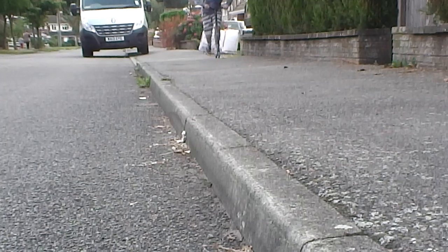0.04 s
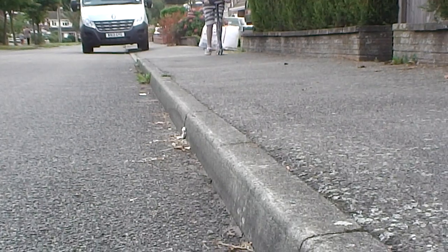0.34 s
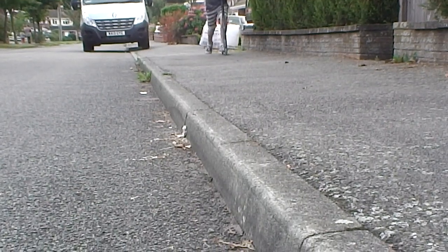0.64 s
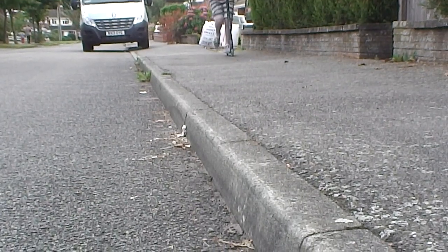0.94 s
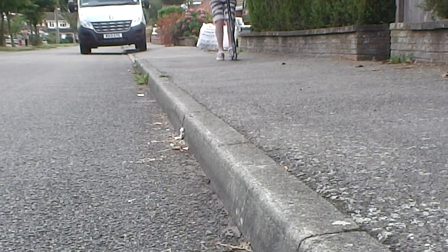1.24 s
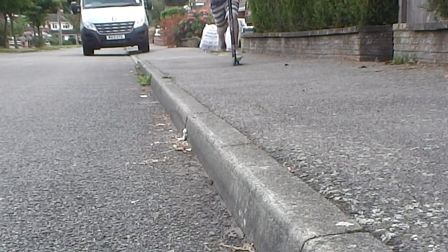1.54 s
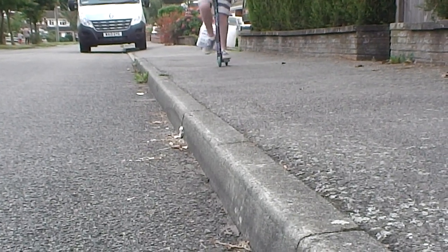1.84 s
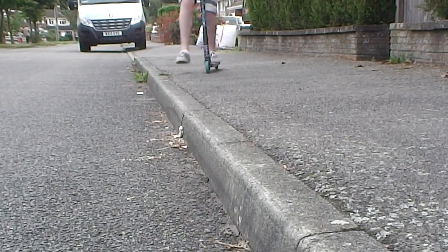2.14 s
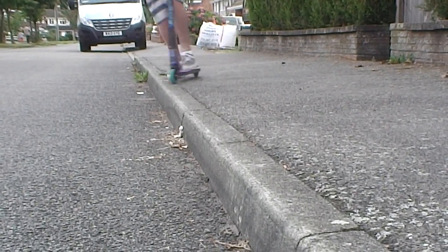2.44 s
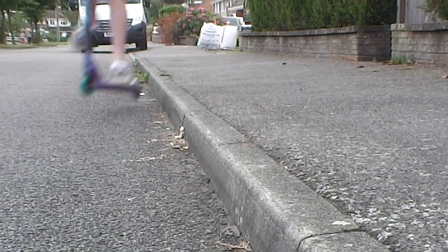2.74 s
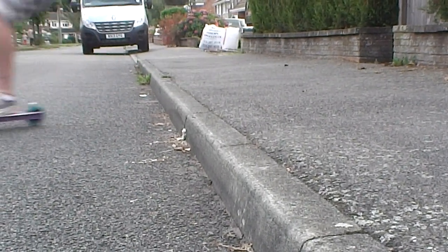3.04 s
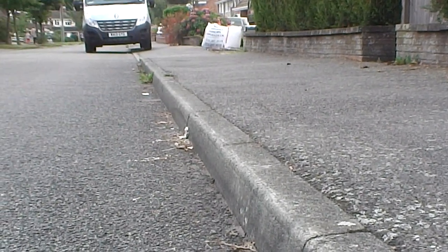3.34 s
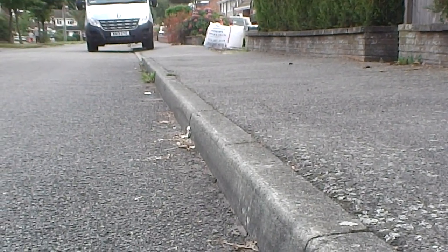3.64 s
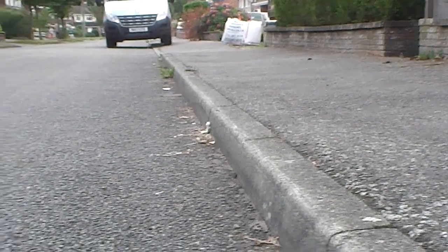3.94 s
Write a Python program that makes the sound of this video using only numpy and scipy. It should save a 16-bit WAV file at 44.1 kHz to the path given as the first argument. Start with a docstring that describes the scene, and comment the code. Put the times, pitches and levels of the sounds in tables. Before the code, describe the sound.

On a suburban street with faint steady traffic, a kick scooter approaches with bursts of metallic rattle. It briefly quietens in a jump, clacks down close to the microphone, then rolls off to the left with a gritty hum.

```python
"""Kick scooter off the kerb

A kick scooter comes along a rough pavement, hops off the kerb, lands hard beside the microphone and
rolls away to the left. The tarmac shakes the deck, which hums in its resonances, and loose metal parts
rattle in short bursts; both fall back during the hop. Behind it is the rush of a suburban street."""
import sys
import numpy as np
from scipy import signal
from scipy.fft import rfft, irfft, next_fast_len
from scipy.io import wavfile
from scipy.ndimage import map_coordinates

SR = 44100
rng = np.random.default_rng(int(sys.argv[2]) if len(sys.argv) > 2 else 0)


def put_to_file(sound):
    """Save the sound as 16-bit audio at rate SR, in the file named by the first command-line argument."""
    columns = np.atleast_2d(sound).T  # one column per channel
    safe = np.clip(columns, -1, 1)
    whole_steps = np.round(safe * 32767)
    wavfile.write(sys.argv[1], SR, whole_steps.astype(np.int16))


N = 176400
T = np.arange(N) / SR
TOP_HZ = 16200


def amp(db):
    """Decibels to gain."""
    return 10 ** (np.asarray(db) / 20)


def unit(x):
    """Scale to rms 1."""
    return x / np.sqrt(np.mean(x ** 2) + 1e-20)


def along(points, hz):
    """Read (Hz, value) points on a log frequency axis."""
    freqs, values = np.transpose(points)
    return np.interp(np.log(hz + 1), np.log(freqs + 1), values)


def curve(rows):
    """Automation: (seconds, value) points joined by straight lines."""
    return np.interp(T, *np.transpose(rows))


def wobble(rate):
    """A smooth random curve with rate knots a second."""
    return map_coordinates(rng.standard_normal(2048), [T * rate], mode="wrap")


def filtered(x, response):
    """Shape x with a response given as a function of frequency."""
    size = next_fast_len(N + SR // 2)
    return irfft(rfft(x, size) * response(np.fft.rfftfreq(size, 1 / SR)), size)[..., :N]


def coloured(x, points):
    """Minimum-phase EQ of unit energy through (Hz, dB) points."""
    size = 4096
    cepstrum = irfft(np.log(amp(along(points, np.fft.rfftfreq(size, 1 / SR)))))
    cepstrum[1:size // 2] *= 2
    cepstrum[size // 2 + 1:] = 0
    impulse = irfft(np.exp(rfft(cepstrum)))
    return signal.fftconvolve(x, impulse / np.linalg.norm(impulse))[:N]


def tail(t60):
    """Dying noise of unit energy."""
    t = T[:SR // 4]
    noise = rng.standard_normal(len(t)) * 1000. ** (-t / t60)
    return noise / np.linalg.norm(noise)


def clicks(rate, spread_db):
    """Random impulses of random size, about rate a second, at rms 1."""
    impulses = (rng.random(N) < rate / SR) * np.sign(rng.standard_normal(N))
    return unit(impulses * amp(spread_db * np.clip(rng.standard_normal(N), -2, 2)))


def add(track, s, x):
    """Mix x into the track at s seconds."""
    part = track[round(s * SR):][:len(x)]
    part += x[:len(part)]


def pan(db):
    """Stereo gains that put left above right by db."""
    return np.array([amp(db / 2), amp(-db / 2)]).reshape(2, -1)


def street(level_db=-32.5, pan_db=-1.54, waver_db=0.47):
    """Far traffic: a steady dull rush, narrow in the bass and wide in the treble."""
    # Tone of the traffic. Each row: frequency in Hz, relative level in dB.
    colour = [(25, -12), (60, -12), (130, -4), (220, -5.5), (340, -9), (600, -3), (950, 0), (1300, -4.5),
              (1800, -14.5), (2200, -23), (2800, -37), (5000, -37.5), (6000, -45.5), (12000, -47.5),
              (16000, -54)]
    # Stereo image. Each row: frequency in Hz, left-right likeness from 0 to 1.
    likeness = [(100, .99), (300, 0.96), (600, 0.94), (1100, 0.76), (2000, 0.66), (5000, 0.28), (12000, .3)]

    def mid_and_side(hz):
        width = np.arccos(np.clip(along(likeness, hz), -1, 1)) / 2
        return amp(along(colour, hz)) * [np.cos(width), np.sin(width)]

    mid, side = filtered(rng.standard_normal((2, N)), mid_and_side)
    rush = unit(np.array([mid + side, mid - side])) * pan(pan_db)
    return rush * amp(level_db + waver_db * wobble(6.91))


def rolling(hum_hz=238, hum_width_hz=13.4):
    """Stones of the tarmac jolt the wheels and set the deck humming."""
    # Resonances of the rolling scooter. Each row: centre in Hz, width in Hz, relative level in dB.
    resonances = [(149, 101, -3.5), (247, 48, 1), (317, 75, -0.5), (468, 50, -3), (564, 88, -2),
                  (687, 114, -2.5), (930, 206, -5.5), (1226, 130, -3), (1480, 340, -7), (1863, 140, -7.5)]
    # Softness of the wheels. Each row: frequency in Hz, relative gain in dB.
    tyre = [(25, -11.5), (100, -2), (1500, -1), (2100, -7.5), (2800, -7.5), (5000, -48), (9000, -70)]
    # How hard the tarmac shakes the deck. Each row: time in seconds, level in dB.
    shake = [(.1, -41), (.6, -40), (.75, -39), (1.1, -47), (1.6, -38.5), (2.25, -36.5), (2.37, -30.5),
             (2.58, -32), (2.68, -41), (2.86, -30.5), (2.89, -27.5), (3.04, -33), (3.3, -32.5),
             (3.7, -36.5), (4, -37)]
    # The deck's main bending mode within the roll. Each row: time in seconds, relative level in dB.
    hum_level = [(.8, -7), (1.35, 1.5), (1.8, -9), (2.5, -6), (3, -5.5), (3.3, -1.5), (4, 0)]

    def mode(hz, centre, width):
        return 1j * hz * width / (centre ** 2 - hz ** 2 + 1j * hz * width)

    def all_modes(hz):
        return sum((-1) ** k * amp(db) * mode(hz, centre, width)
                   for k, (centre, width, db) in enumerate(resonances))

    jolts = clicks(rate=1500, spread_db=4.5) * amp(2.32 * wobble(35))
    body = coloured(filtered(jolts, all_modes), tyre)
    hum = filtered(clicks(rate=1500, spread_db=2.5), lambda hz: mode(hz, hum_hz, hum_width_hz))
    return (amp(-2) * unit(body) + amp(curve(hum_level)) * unit(hum)) * amp(curve(shake))


def wheel_drone():
    """Rough ground drives a low rumble, a faint whine and a mid drone that peaks on landing."""
    # Tone of each layer. Each row: frequency in Hz, relative level in dB.
    drone_colour = [(250, -36), (450, -12), (570, 2), (680, -1), (820, -5), (1500, -25.5), (1900, -14),
                    (2500, -34), (4000, -53)]
    rumble_colour = [(25, -1), (70, -2), (150, 2.5), (220, -21), (500, -60)]
    whine_colour = [(1000, -48), (1650, -13), (1780, 4.5), (1950, -7), (2150, -20), (3000, -57)]
    # Fader moves of each layer. Each row: time in seconds, level in dB.
    drone_level = [(2.2, -61), (2.37, -31.5), (2.45, -45), (2.58, -38), (2.7, -47), (2.87, -53),
                   (2.93, -32.5), (2.98, -23), (3.04, -33), (3.25, -35.5), (3.5, -53), (4, -54)]
    rumble_level = [(.1, -67), (1.3, -86), (1.55, -42), (2.3, -45), (2.7, -49), (3.2, -49), (4, -47)]
    whine_level = [(.3, -75), (.6, -47), (.85, -49), (1.05, -74), (2.9, -72), (3.1, -48), (3.6, -47.5),
                   (4, -49)]
    layers = [(drone_colour, drone_level), (rumble_colour, rumble_level), (whine_colour, whine_level)]
    return sum(unit(coloured(clicks(rate=1000, spread_db=2.5), colour)) * amp(curve(level))
               for colour, level in layers)


def grit(patchy_db=3.3, stones_db=-3):
    """Fine crunch of the wheels on the road, with ticks of single stones."""
    # Tone of the gritty hiss. Each row: frequency in Hz, relative level in dB.
    colour = [(500, -30), (1400, 4), (1950, 7.5), (2400, -6), (2800, -10), (3500, 5.5), (4200, -4),
              (5100, 4), (5900, -5), (9000, -14.5), (16000, -16)]
    # Its fader moves. Each row: time in seconds, relative level in dB.
    level = [(.1, -77), (2.25, -81), (2.36, -72), (2.56, -48.5), (2.63, -58), (2.83, -55), (2.88, -58),
             (3.2, -45), (3.6, -46.5), (4, -49.5)]
    crunch = clicks(rate=5000, spread_db=7) * amp(patchy_db * wobble(90))
    stones = amp(stones_db) * clicks(rate=90, spread_db=3.5)
    return unit(coloured(crunch + stones, colour)) * amp(curve(level))


def pings(hits, hz, spread, t60, count):
    """Each metal contact rings at count random pitches around hz, keeping its energy."""
    onsets, t = np.flatnonzero(hits), T[:440].astype(np.float32)
    pitch = np.minimum(hz * np.exp(spread * rng.standard_normal((N, count, 1))[onsets]), TOP_HZ)
    rings = np.sin(np.float32(2 * np.pi * pitch) * t).sum(1) * np.float32(amp(-60 * t / t60))
    rings = rings * (hits[onsets] / np.linalg.norm(rings, axis=1))[:, None]
    positions = onsets[:, None] + np.arange(len(t))
    return np.bincount(positions.ravel(), rings.ravel(), N)[:N]


def rattle(clump_db=6, clump_rate=80, burst_trim_db=-2):
    """Loose metal parts chatter in swelling clumps of tiny clicks, each with a short bright ring."""
    # Bursts of rattle. Each row: start in seconds, length in seconds, relative level in dB.
    bursts = [(0.119, 0.02, -47.5), (0.195, 0.045, -56), (0.258, 0.0056, -52), (0.316, 0.036, -51.5),
              (0.393, 0.013, -49), (0.463, 0.0059, -50.5), (0.692, 0.0098, -52), (0.72, 0.04, -47),
              (0.764, 0.014, -51.5), (0.816, 0.015, -40.5), (0.85, 0.0365, -47), (0.893, 0.016, -53.5),
              (0.94, 0.02, -45), (0.982, 0.026, -47.5), (1.028, 0.0093, -47.5), (1.069, 0.00832, -42),
              (1.101, 0.027, -46.5), (1.138, 0.013, -54), (1.175, 0.017, -45.5), (1.215, 0.02, -53),
              (1.278, 0.011, -44.5), (1.353, 0.0049, -53), (1.534, 0.027, -48), (1.566, 0.014, -47),
              (1.594, 0.022, -44), (1.634, 0.0319, -48.5), (1.697, 0.014, -41.5), (1.731, 0.0228, -51),
              (1.802, 0.00766, -51), (1.827, 0.0367, -54.5), (1.887, 0.0084, -37), (1.976, 0.014, -40),
              (2.031, 0.01308, -43.5), (2.072, 0.013, -39), (2.103, 0.029, -42), (2.172, 0.0093, -36.5),
              (2.2, 0.028, -43), (2.257, 0.02, -37.5), (2.294, 0.034, -42.5), (2.346, 0.014, -35.5),
              (2.373, 0.04, -36.5), (2.432, 0.019, -36), (2.451, 0.035, -40.5), (2.51, 0.0063, -36.5),
              (2.877, 0.016, -33), (2.9, 0.016, -41), (2.956, 0.013, -32.5), (2.985, 0.011, -30),
              (3.012, 0.0069, -41), (3.057, 0.015, -39), (3.086, 0.00603, -42), (3.101, 0.009, -44),
              (3.119, 0.013, -43), (3.174, 0.0065, -37), (3.331, 0.007, -38.5), (3.404, 0.0177, -41.5),
              (3.438, 0.019, -37.5), (3.526, 0.0092, -38.5), (3.597, 0.011, -40), (3.64, 0.0093, -39.5),
              (3.721, 0.0076, -42.5), (3.77, 0.01, -43)]
    # Lighter chatter between the bursts. Each row: time in seconds, relative level in dB.
    chatter = [(.1, -59), (.42, -69), (.5, -92.5), (.65, -67), (.72, -59), (1.3, -62), (1.4, -64.5),
               (1.48, -69), (1.54, -51.5), (2.2, -52), (2.45, -47), (2.52, -46), (2.6, -69), (2.87, -76),
               (2.885, -40.5), (3.05, -46.5), (3.4, -52), (4, -48.5)]
    # The lowest ring within the rattle. Each row: time in seconds, relative level in dB.
    clink_level = [(.3, -4.5), (.9, -1), (1.4, -5.5), (2.2, -9), (2.9, -28), (4, -2)]
    # Tone of the metal. Each row: frequency in Hz, relative gain in dB.
    colour = [(200, -65), (2000, -41), (2900, -9), (3500, -12.5), (4400, -3), (5200, -7), (6200, -5),
              (7400, 2), (8600, 0.5), (10500, 0), (12800, -0.5), (15500, -12.5)]
    shaking = unit(amp(clump_db * np.clip(wobble(clump_rate), -2, 1.3))) * amp(curve(chatter))
    contacts = clicks(rate=1300, spread_db=4)
    for start, length, db in bursts:
        near = slice(max(round((start - length) * SR), 0), round((start + 2 * length) * SR))
        swell = np.exp(-np.abs(2 * (T[near] - start) / length - 1) ** 3)
        burst_rms = np.sqrt(np.sum((swell * contacts[near]) ** 2) / (length * SR) + .02)
        shaking[near] += swell / burst_rms * amp(db + burst_trim_db)
    hits = contacts * shaking
    struck_part = rng.integers(0, 2, N)
    ticks = np.zeros(N)
    for part in range(2):
        tick = amp(-3.5) * tail(t60=0.0082) + amp(-15) * tail(t60=0.07)  # bare click, faint frame ring
        ticks += signal.oaconvolve(hits * (struck_part == part), tick)[:N]
    clink = amp(curve(clink_level)) * pings(hits, hz=4343, spread=0.109, t60=0.017, count=1)
    sparkle = amp(-3.5) * pings(hits, hz=9455, spread=0.319, t60=0.012, count=2)
    return coloured(ticks + sparkle + clink, colour)


def thuds_and_knocks(thud_hz=560, thud_decay_s=0.0014, clank_t60_s=0.078, vary_db=1.0, radiate_hz=110):
    """Each impact is a dead knock, a ring of the deck's modes and a clank of the fittings."""
    # A dull foot push on the pavement at 0.7 s, and wheels striking bumps, the kerb and the road.
    # Each row: start in seconds, relative thump in dB, contact in seconds, relative clank in dB.
    strikes = [(.404, -29, 0.0001765, -35.5), (.7, -11, 0.0031, -35.5), (2.311, -32, 0.00102, -49.5),
               (2.34, -19.5, 0.00066, -29), (2.363, -14.5, 0.0007, -34), (2.367, -36, 0.00073, -46),
               (2.839, -2.5, 0.00039, -18.5), (2.842, -26, 0.00036, -24), (2.8785, -12.5, 0.0005, -25),
               (2.8852, -9.5, 0.00073, -43), (2.908, -16.5, 0.00069, -31), (2.9564, -18.5, 0.0006, -28),
               (2.9882, -21.5, 0.00055, -33), (2.992, -26, 0.000245, -27.5)]
    # Modes of the struck deck and stem. Each row: frequency in Hz, relative level in dB, t60 in seconds.
    modes = [(241.3, -11, 0.31), (533, -4, 0.064), (620, -14.5, .07), (885, -7, 0.032), (1420, -6, 0.027),
             (1858, -1, 0.016), (2286, -13.5, 0.036), (3080, -15, 0.035), (4020, -24, 0.055),
             (4700, -34, 0.05)]
    # Tone of the clank. Each row: frequency in Hz, relative gain in dB.
    clank_colour = [(300, -55), (1500, 0), (2300, 5.5), (2900, -5.5), (3800, -1), (5000, 4.5),
                    (6200, -10.5), (8000, -9.5), (12000, -7), (16000, -14)]
    deck, fittings, t = np.zeros(N), np.zeros(N), T[:SR // 3]
    thud = amp(4) * np.sin(2 * np.pi * thud_hz * t) * np.exp(-t / thud_decay_s)
    for start, thump_db, contact_s, clank_db in strikes:
        ring = sum(amp(db - vary_db * rng.normal() - 60 * t / t60) * np.sin(2 * np.pi * hz * t)
                   for hz, db, t60 in modes)
        push = np.sin(np.pi * np.minimum(t[:SR // 100] / contact_s, 1)) ** 2  # longer contact is duller
        add(deck, start, amp(thump_db) * signal.fftconvolve(0.59 * (ring + thud), push / push.sum()))
        add(fittings, start, amp(clank_db - 8.5 - 60 * t / clank_t60_s) * rng.standard_normal(len(t)))
    thumps = filtered(deck, lambda hz: 1j * hz / (radiate_hz + 1j * hz))
    return thumps + coloured(fittings, clank_colour)


def walls(x, t60):
    """Scattered reflections off the road and garden walls, different at each ear."""
    return np.array([signal.fftconvolve(x, tail(t60))[:N] for _ in range(2)])


def scene(body_pan_db=-1.3, scatter_db=-7, treble_db=-2, body_send_db=-11, reverb_db=-15):
    """The deck's low sound stays near the middle; the treble follows the scooter to the left."""
    # Treble pan as the scooter passes. Each row: time in seconds, left minus right in dB.
    path = [(2.5, -0.5), (2.85, 4.5), (3.0, 3), (3.5, 5.5), (4, 11)]
    body = rolling() + wheel_drone() + thuds_and_knocks()
    bright = rattle() + grit()
    treble = (bright + amp(scatter_db) * walls(bright, t60=0.01)) * pan(curve(path))
    mix = street() + body * pan(body_pan_db) + amp(treble_db) * treble
    return mix + amp(reverb_db) * walls(amp(body_send_db) * body + bright, t60=0.23)


def record(dry, start_s=0.1, low_cut_hz=45):
    """The sound cuts in after a moment; the microphone loses the deepest bass and the top."""
    return filtered(dry * (T >= start_s), lambda hz: (hz < TOP_HZ) * 1j * hz / (low_cut_hz + 1j * hz))


dry = scene()
out = record(dry)
put_to_file(out)
```